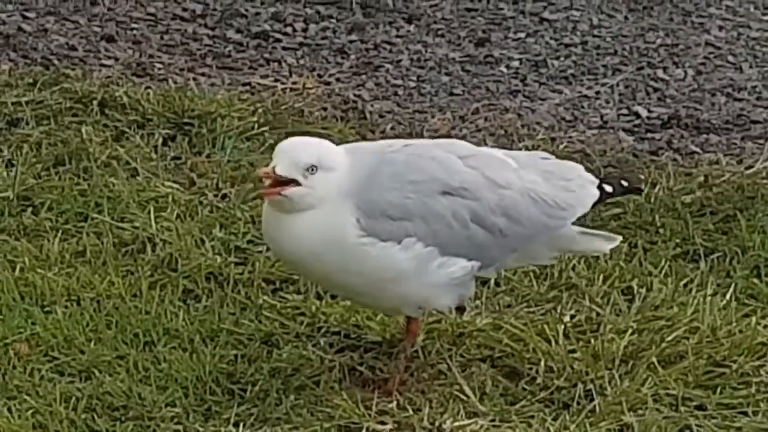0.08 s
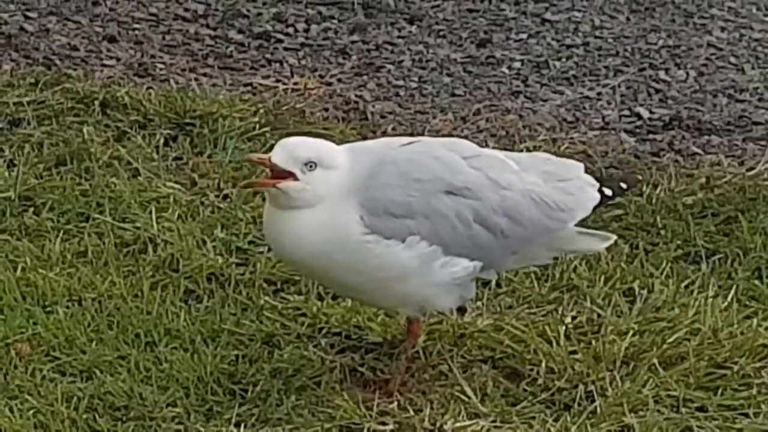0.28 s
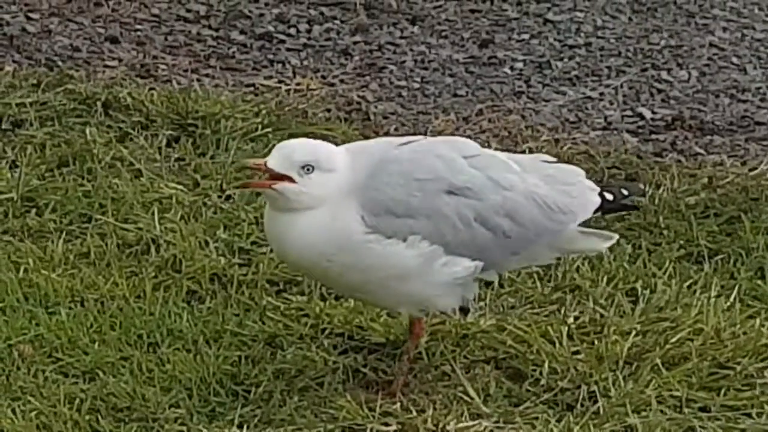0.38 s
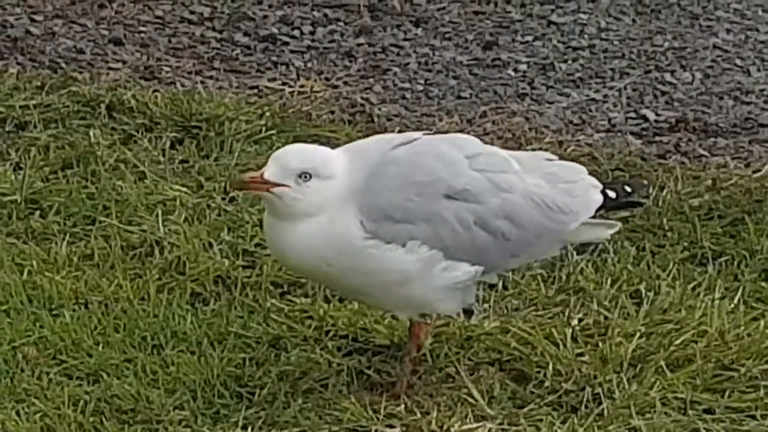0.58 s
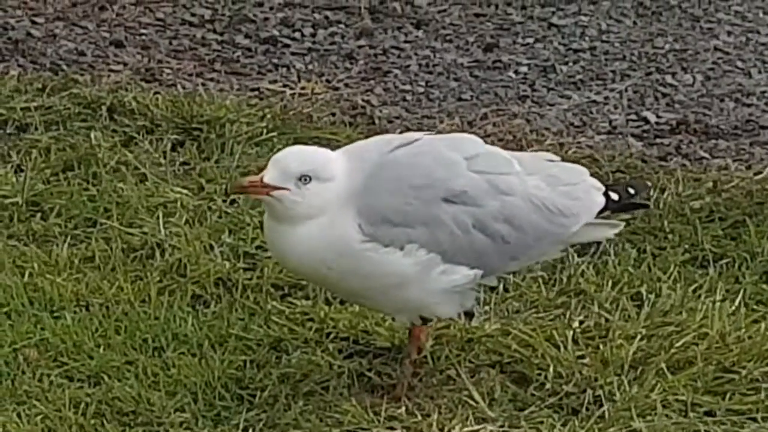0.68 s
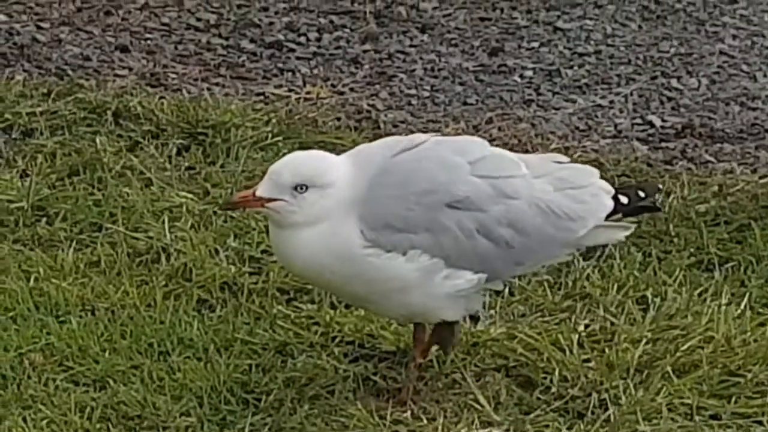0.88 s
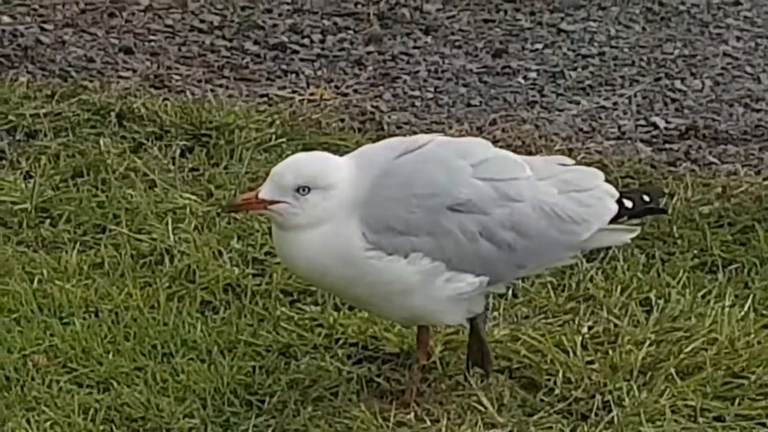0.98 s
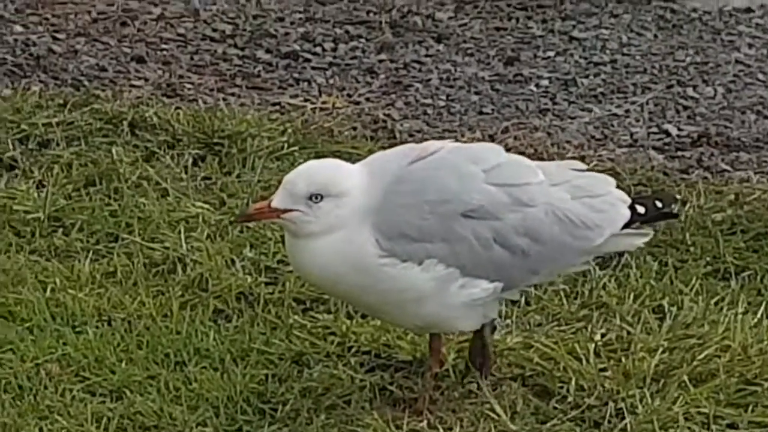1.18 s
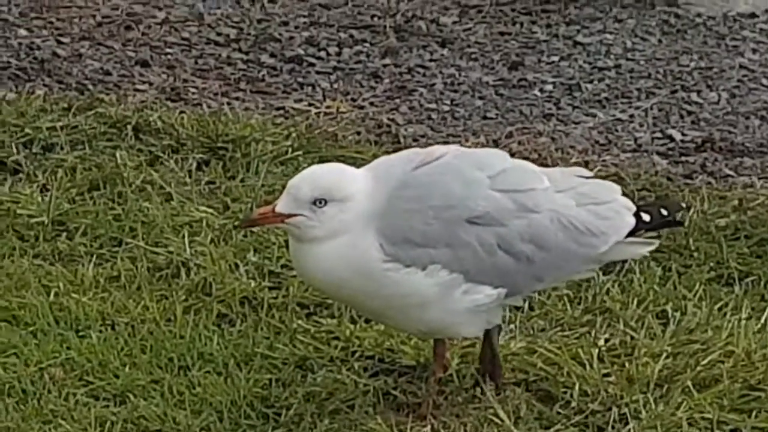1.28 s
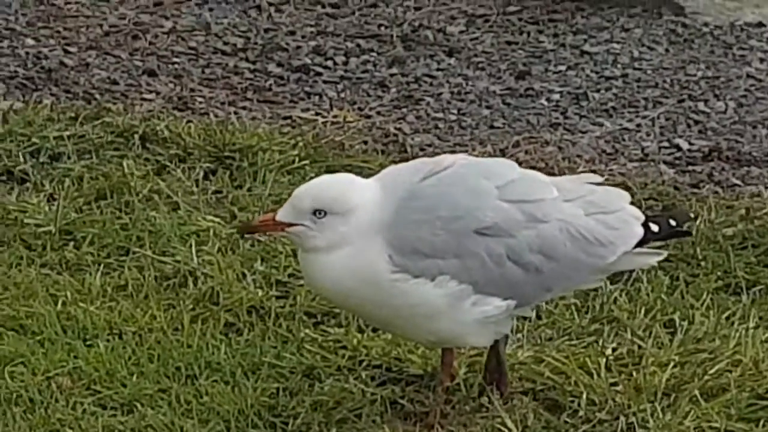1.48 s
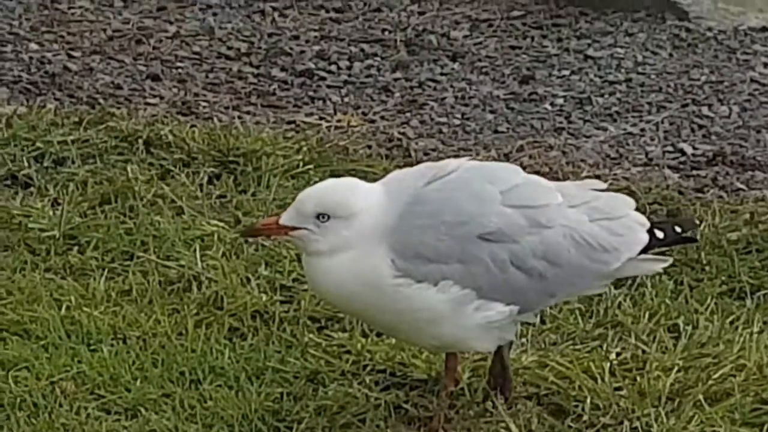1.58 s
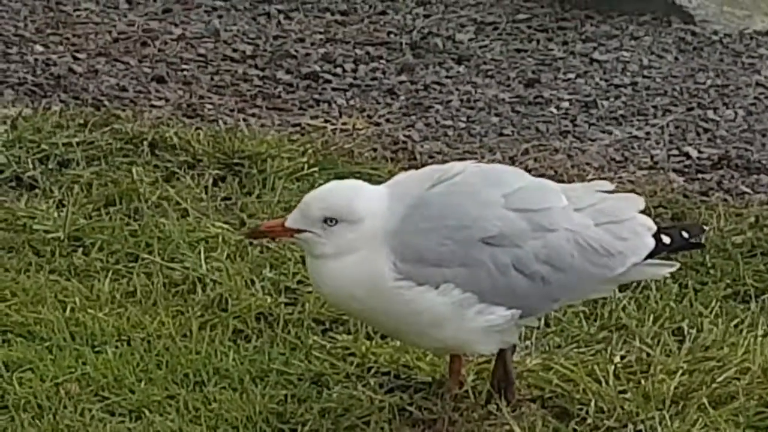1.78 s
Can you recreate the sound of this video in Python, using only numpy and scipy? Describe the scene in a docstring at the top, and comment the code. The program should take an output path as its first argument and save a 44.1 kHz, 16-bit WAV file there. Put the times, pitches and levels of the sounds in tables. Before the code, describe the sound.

One nearby gull cries once, a hoarse catch and squeak breaking into a rough scream that falls to a clearer whine; afterwards only distant engine hum, soft wash and light wind bumping the microphone.

```python
"""Gull cry over a distant engine

A gull on the grass close by cries once: a hoarse catch, a breaking squeak, a harsh rising scream and a clean
falling whine. Its voice is a source-filter model: overtones and air noise, roughened, shaped by the throat.
Behind it a distant engine hums off to the right as wavering sinusoids, with a wash of filtered noise. Light
wind, low noise in gusts, touches the microphone, and a small far bird chips once as a falling sinusoid.
"""
import sys
import numpy as np
from scipy import signal
from scipy.fft import rfft, irfft
from scipy.io import wavfile

SR = 44100
rng = np.random.default_rng(int(sys.argv[2]) if len(sys.argv) > 2 else 0)


def to_wav(s):
    """Save 16-bit WAV."""
    ch = np.atleast_2d(s).T  # columns
    pcm = np.round(np.clip(ch, -1, 1) * 32767)  # PCM
    wavfile.write(sys.argv[1], SR, pcm.astype(np.int16))


N = 79380  # samples
T, HZ = np.arange(N) / SR, np.fft.rfftfreq(N, 1 / SR)  # time [s] and frequency [Hz] axes

# Fundamental of the cry: (time [s], frequency [Hz])
CRY_PITCH = [(.253, 1520), (.262, 1334), (.267, 1113), (.318, 1188), (.338, 1163), (.36, 1203),
             (.378, 1228), (.39, 1279), (.404, 1198), (.44, 1175), (.5, 1151), (.6, 1101), (.63, 1042),
             (.673, 996), (.735, 919)]
# Loudness of the cry: (time [s], level [dB])
CRY_LEVEL = [(.253, -58), (.258, -41.5), (.2635, -49), (.268, -27), (.319, -27), (.328, -30), (.345, -30),
             (.394, -36.5), (.415, -37), (.445, -33.5), (.495, -34), (.525, -33), (.61, -34.5),
             (.69, -37.5), (.727, -43), (.742, -87)]
# State of the voice, clipped to 0-1 in use: (time [s], roughness [0-1], bill closure [0-1])
VOICE_STATE = [(.265, 0.56, 0.4), (.315, 0.68, -0.5), (.335, .9, 0), (.35, 0.83, 0), (.39, 0.75, 0.08),
               (.44, .8, 0.08), (.49, 0.58, 0.24), (.53, 0.37, 0.05), (.6, 0.27, 0.4), (.66, 0.11, 0.71),
               (.73, 0.05, 1)]
# Resonances of throat and bill: (frequency [Hz], gain with bill open [dB], gain with bill closed [dB])
THROAT_GAIN = [(500, -14, -37), (920, -15, -5.5), (1180, -14.5, -2.5), (1600, -3.5, -6), (1960, 0, -1.5),
               (2214, 0, 3.5), (2870, -4.5, -16.5), (3497, -0.5, -8), (3750, -13, -21.5), (4500, -6, -24),
               (5330, -22.5, -52), (6490, -33.5, -66), (6760, -27.5, -25), (6980, -15, -42),
               (7780, -18.5, -25), (8200, -21.5, -48), (9500, -20.5, -54), (10400, -31, -71),
               (11600, -21, -51), (12000, -25, -58), (13300, -23.5, -61), (14500, -28, -62)]
# Air noise before the throat: (frequency [Hz], gain [dB])
AIR_COLOUR = [(700, -18.5), (2300, -10), (4000, 1), (7000, 2.5), (14000, 5.5)]
AIR_DB = -3.5  # air noise relative to the tone at full roughness
JITTER, JITTER_HZ = 0.0231, 380  # rms pitch deviation [fraction] at full roughness, and its bandwidth
SCATTER, SCATTER_HZ = 0.26, 305  # rms shake of each overtone at full roughness, and its bandwidth
SMEAR = 0.97  # phase lag of the throat spreads each pulse [radians per overtone number squared]
# The membranes stall briefly at uneven intervals, most deeply at the start of the scream
FLUTTER_HZ, FLUTTER_SPREAD = 124.5, 0.3496  # mean stall rate, rms deviation [fraction]
FLUTTER_DEPTH, FLUTTER_FADE_S = 0.9, 0.16
# A faster rattle puts side tones around each overtone
RATTLE_HZ, RATTLE_WIDTH_HZ, RATTLE_DEPTH = 236, 31, 0.13

# Squeak as the voice breaks: (time [s], frequency [Hz], level [dB])
SQUEAK_NOTE = [(.234, 2540, -45), (.237, 2580, -43), (.243, 2700, -44), (.251, 2490, -49.5),
               (.259, 2660, -40), (.268, 2740, -41)]
# Rasp that goes with the squeak: (frequency [Hz], gain [dB])
SQUEAK_RASP_COLOUR = [(1000, -17), (1900, -14), (2800, -19), (3350, 7.5), (3750, -7), (4150, -5),
                      (5000, -31), (6200, -30), (7700, -16), (9500, -27), (14500, -29)]
SQUEAK_RASP_DB = 3  # relative to the note
# Hoarse catch before the cry: (time [s], fundamental [Hz], level [dB])
CATCH_NOTE = [(.189, 900, -68), (.193, 918, -48.5), (.206, 1022, -43), (.212, 1055, -39), (.234, 1110, -38),
              (.242, 1200, -76)]
# Throat filter during the catch: (frequency [Hz], gain [dB])
CATCH_THROAT = [(500, -14), (900, 0), (1300, -24), (1750, -3), (2050, 0), (2600, -8), (3300, -11),
                (3800, -22), (4300, -23), (5700, -42), (7700, -18), (9700, -38), (11000, -34), (14500, -35)]
CATCH_ROUGH, CATCH_AIR_DB = 1.5, -3.5  # roughness (1 = full), air noise relative to the tone

# Level difference of the gull at the microphone: (frequency [Hz], left minus right [dB])
GULL_LEVEL_DIFFERENCE = [(900, -7), (1150, 2.5), (1700, -4.5), (2300, 2.5), (2900, -2), (3450, -2),
                         (4600, -4), (6000, -8.5), (7700, -10.5), (9500, -3.5), (11000, 5.5), (13300, -6.5),
                         (14500, 10)]
# Phase difference of the gull: (frequency [Hz], lead of the left side [rad])
GULL_PHASE_LEAD = [(1000, 0.5), (2300, 1.06), (3000, 1), (3900, 1.04), (4700, 0.5), (7700, 1), (9400, 1.9),
                   (11000, 0.5), (13000, 4), (14500, -18)]
ECHO_DB, ECHO_T60_S = -16, 0.06  # scattered energy, time to decay by 60 dB

# Small bird far off: (time [s], frequency [Hz], level [dB])
CHIP_NOTE = [(.865, 5600, -84), (.88, 5300, -77), (.892, 4700, -69.5), (.901, 4400, -82), (.913, 3880, -60),
             (.926, 3550, -78)]
# Engine lines: (frequency [Hz], level [dB])
HUM_LINES = [(75.6, -60.5), (151, -58.5), (349, -77.5), (419, -65), (476, -65.5), (554.5, -64),
             (897, -61.5)]
HUM_WAVER, HUM_WAVER_HZ = 0.47, 3.2  # rms waver in each quadrature, and its bandwidth
FAR_LAG_S = 0.00048  # far sounds reach the right side first

# Gusts on the microphone: (time [s], half length [s], level [dB])
GUST_TIMES = [(.15, .04, -53), (.29, .028, -45), (.53, .02, -53), (.625, .022, -45), (.69, .028, -45),
              (.772, .018, -43), (.825, .02, -50), (1.325, .02, -50), (1.425, .015, -50)]
# Breeze between the gusts: (time [s], level [dB])
BREEZE_LEVEL = [(0, -53), (.3, -56.5), (.8, -51), (.94, -73), (1.05, -57), (1.5, -54.5), (1.62, -71),
                (1.8, -55)]
# Spectrum of the wind: (frequency [Hz], gain [dB])
WIND_COLOUR = [(20, -7), (60, -3.5), (120, 1), (250, -9.5), (600, -16.5), (2000, -103)]
WIND_RIGHT_DB = -3.5  # right relative to left

# Spectrum of the distant wash: (frequency [Hz], relative density [dB])
WASH_SPECTRUM = [(25, -19), (80, -0.5), (150, -5.5), (220, -7.5), (400, -10.5), (650, -13), (900, -10.5),
                 (1150, -17), (1500, -17), (1900, -20), (2330, -18.5), (2650, -27.5), (3400, -30),
                 (4400, -40), (7000, -42.5), (10000, -47.5), (13000, -43), (14500, -42.5)]
# Stereo image of the wash: (frequency [Hz], left-right likeness [0-1], left minus right [dB])
WASH_STEREO = [(60.3, 0.27, 2.5), (300, 0.72, 3), (650, 0.044, 0), (1460, 0.6, -5.5), (2260, 0.22, -2.5),
               (4900, 0, -3.5), (12300, 0.034, 1.5)]
WASH_DB, DIFFUSE_HZ = -48.5, 633  # rms level; below this frequency the wash comes from all around
FLICKER_DB, FLICKER_HZ = 1.46, 23  # rms flicker of each band, and its bandwidth

EDGE_HZ = 14650  # upper band limit of the recorder


def amp(db):
    """The decibel law: level in dB to amplitude ratio."""
    return 10 ** (np.asarray(db) / 20)


def evened(x):
    """Normalization by the root mean square, to rms 1."""
    return x / np.sqrt(np.mean(abs(x) ** 2) + 1e-20)


def curves(table):
    """Linear interpolation of each column of a time table at every sample."""
    times, *columns = np.transpose(table)
    return [np.interp(T, times, column) for column in columns]


def during(table):
    """Gating: true from the first to the last row of a time table."""
    return (T >= table[0][0]) & (T <= table[-1][0])


def read(table, hz):
    """Log-frequency interpolation of each column of a spectrum table."""
    freqs, *columns = np.transpose(table)
    return [np.interp(np.log(hz + 1), np.log(freqs), column) for column in columns]


def colour(x, db):
    """Linear filtering: multiplies the spectrum by a gain per frequency."""
    return irfft(rfft(x) * amp(db), N)


def wobble(width_hz, centre_hz=0):
    """Band-limited Gaussian noise of rms 1, used as a random modulator."""
    band = np.exp(-((HZ - centre_hz) / width_hz) ** 2 / 2)
    return evened(irfft(rfft(rng.standard_normal(N)) * band, N))


def gull():
    """Near-field stereo: level and phase differences between sides, and brief scatter from the ground."""
    side_db, = read(GULL_LEVEL_DIFFERENCE, HZ)
    lead, = read(GULL_PHASE_LEAD, HZ)
    voice = catch() + squeak() + cry()
    half_lead = 0.5 * np.array([[1], [-1]]) * lead
    pair = irfft(rfft(voice) * np.exp(1j * half_lead), N)
    t = T[:SR // 4]
    scatter = rng.standard_normal((2, len(t))) * amp(-60 * t / ECHO_T60_S) * (t > .003)
    scatter /= np.linalg.norm(scatter[0])  # unit energy on the left
    echo = signal.fftconvolve(voice[None], scatter, axes=1)[:, :N]
    return colour(pair + amp(ECHO_DB) * echo, np.array([side_db, -side_db]) / 2)


def cry():
    """Amplitude modulation of a source-filter voice: harsh stutter first, clearing as the bill closes."""
    rough, closed = np.clip(curves(VOICE_STATE), 0, 1)
    pitch, = curves(CRY_PITCH)
    tone, puffs = syrinx(pitch, rough, lambda hz: throat(hz, closed))
    air_db, = read(AIR_COLOUR, HZ)
    open_air, closed_air = [evened(colour(puffs, db + air_db)) for db in read(THROAT_GAIN, HZ)]
    air = (1 - closed) * open_air + closed * closed_air

    beats = np.cumsum(FLUTTER_HZ * (1 + FLUTTER_SPREAD * wobble(FLUTTER_HZ))) / SR
    stalls = np.sin(np.pi * beats) ** 8  # one narrow peak per beat
    fade = np.exp(-np.maximum(T - VOICE_STATE[0][0], 0) / FLUTTER_FADE_S)
    depth = FLUTTER_DEPTH * fade * (1 + 0.14 * wobble(FLUTTER_HZ))
    flutter = 1 - np.clip(depth, 0, 1) * stalls
    rattle = 1 + RATTLE_DEPTH * np.sqrt(rough) * wobble(RATTLE_WIDTH_HZ, RATTLE_HZ)

    voice = tone + amp(AIR_DB) * rough * air
    return voice * flutter * rattle * amp(curves(CRY_LEVEL)[0]) * during(CRY_LEVEL)


def syrinx(pitch, rough, shape_db):
    """Harmonic series with random phase and amplitude modulation, and air noise pulsing once per cycle."""
    turn = 2 * np.pi * np.cumsum(pitch * (1 + JITTER * rough * wobble(JITTER_HZ))) / SR
    tone, power = np.zeros(N), np.zeros(N)
    for k in range(1, 15):
        gain = amp(shape_db(k * pitch))
        # complex shake: amplitude and phase of this overtone alone
        shake = SCATTER * rough * (wobble(SCATTER_HZ) + 1j * wobble(SCATTER_HZ)) / np.sqrt(2)
        overtone = (1 + shake) * np.exp(1j * (k * turn - SMEAR * k ** 2))
        tone += gain * overtone.real
        power += gain ** 2 * (1 + (SCATTER * rough) ** 2) / 2
    puffs = rng.standard_normal(N) * (1 + 0.68 * np.cos(turn))
    return tone / np.sqrt(power), puffs  # tone has an expected power of 1 throughout


def throat(hz, closed):
    """Vocal-tract resonance: gain in dB, interpolated between the open and the closed bill."""
    open_db, closed_db = read(THROAT_GAIN, hz)
    return open_db + closed * (closed_db - open_db)


def squeak():
    """Register break: a thin frequency-modulated sinusoid with filtered noise, just before the scream."""
    hz, db = curves(SQUEAK_NOTE)
    phase = 2 * np.pi * np.cumsum(hz * (1 + 0.0067 * wobble(JITTER_HZ))) / SR
    note = evened(np.sin(phase))
    rasp = evened(colour(rng.standard_normal(N), read(SQUEAK_RASP_COLOUR, HZ)[0]))
    return (note + amp(SQUEAK_RASP_DB) * rasp) * amp(db) * during(SQUEAK_NOTE)


def catch():
    """Source-filter voicing at high roughness: the voice starts low and hoarse."""
    pitch, db = curves(CATCH_NOTE)
    tone, puffs = syrinx(pitch, CATCH_ROUGH, lambda hz: read(CATCH_THROAT, hz)[0])
    air = evened(colour(puffs, read(CATCH_THROAT, HZ)[0]))
    return evened(tone + amp(CATCH_AIR_DB) * air) * amp(db) * during(CATCH_NOTE)


def chip():
    """Frequency modulation: one thin falling sinusoid with random jitter, from a far bird."""
    hz, db = curves(CHIP_NOTE)
    phase = 2 * np.pi * np.cumsum(hz * (1 + 0.026 * wobble(300))) / SR
    return np.sin(phase) * amp(db) * during(CHIP_NOTE)


def hum():
    """Narrow-band line spectrum of a distant engine; the interaural-type delay places it to the right."""
    out, t = np.zeros((2, N)), np.array([T - FAR_LAG_S, T])
    for hz, db in HUM_LINES:
        waver = 1 + HUM_WAVER * (wobble(HUM_WAVER_HZ) + 1j * wobble(HUM_WAVER_HZ))
        line = waver * np.exp(2j * np.pi * (hz * t + rng.random()))
        out += amp(db) * evened(line.real)
    return out


def wind():
    """Turbulent pressure: low noise, independent at each side, in short gusts over a lumpy breeze."""
    breeze = amp(curves(BREEZE_LEVEL)[0] + 3.0 * wobble(27))
    gusts = sum(amp(db) * np.exp(-((T - s) / half) ** 2) for s, half, db in GUST_TIMES)
    rumble = evened(colour(rng.standard_normal((2, N)), read(WIND_COLOUR, HZ)[0]))
    return rumble * (breeze + gusts) * amp([[0], [WIND_RIGHT_DB]])


def wash():
    """Partially coherent noise: steady far sound whose middle bands flicker gently."""
    same, side_db = read(WASH_STEREO, HZ)
    same = np.clip(same, -1, 1)
    right, other = rfft(rng.standard_normal((2, N)))
    lag = np.exp(-2j * np.pi * HZ * FAR_LAG_S * (HZ > DIFFUSE_HZ))
    left = same * right * lag + np.sqrt(1 - same ** 2) * other
    side_gain_db = np.array([side_db, -side_db]) / 2
    pair = colour(irfft(np.array([left, right]), N), read(WASH_SPECTRUM, HZ)[0] + side_gain_db)
    for lo, hi in [(200, 1100), (1100, 1900), (1900, 2700)]:  # Hz, each band flickers by itself
        band = irfft(rfft(pair) * ((HZ >= lo) & (HZ < hi)), N)
        pair = pair + band * (amp(FLICKER_DB * wobble(FLICKER_HZ)) - 1)
    return amp(WASH_DB) * evened(pair)


def scene():
    """Superposition of the gull and its surroundings."""
    return gull() + chip() + hum() + wind() + wash()


def record(dry):
    """Band limiting by the recorder: a linear-phase low-pass filter."""
    lowpass = signal.firwin(511, EDGE_HZ, window=("kaiser", 9), fs=SR)
    return signal.oaconvolve(dry, lowpass[None], "same")


dry = scene()
out = record(dry)
to_wav(out)
```